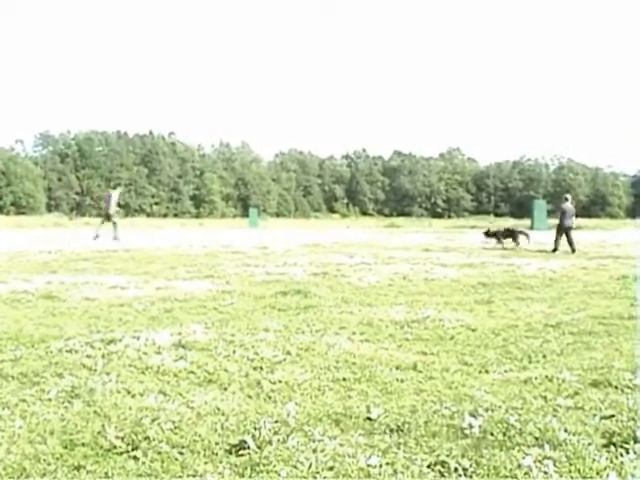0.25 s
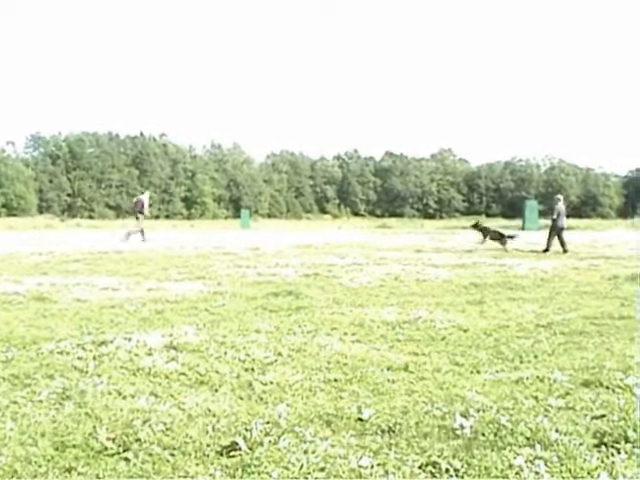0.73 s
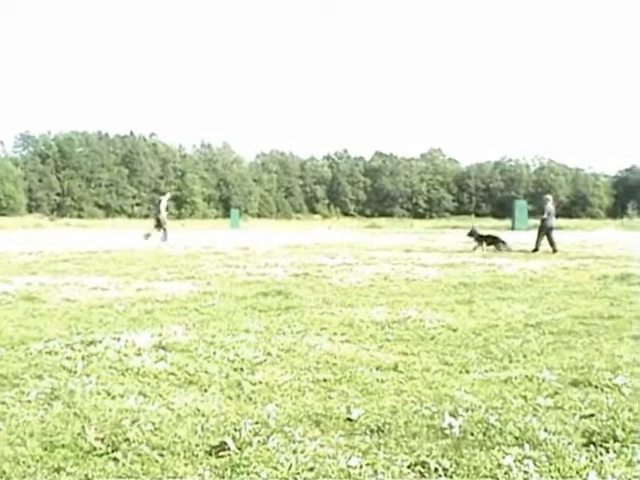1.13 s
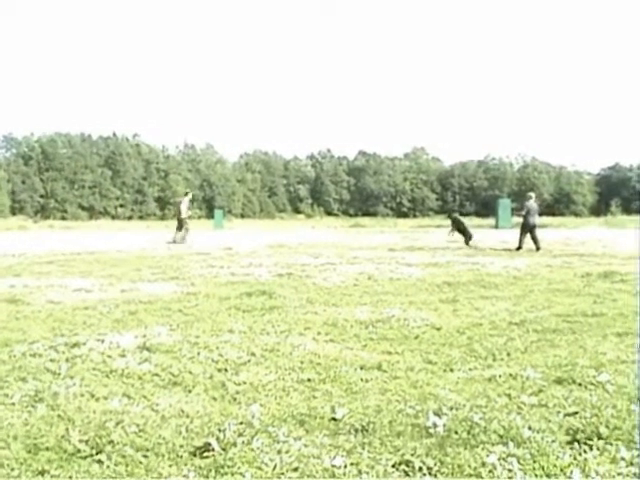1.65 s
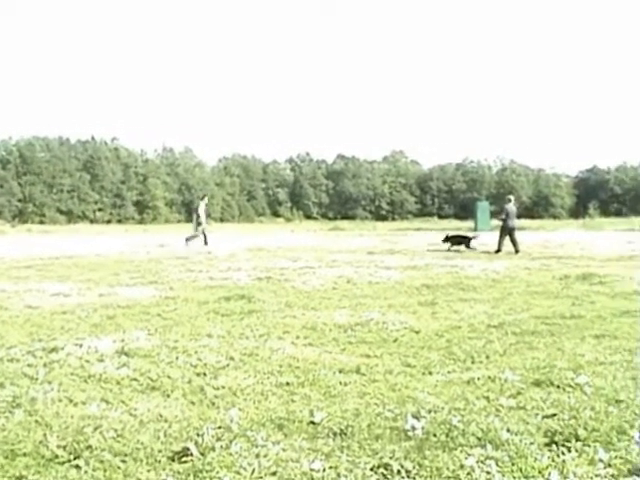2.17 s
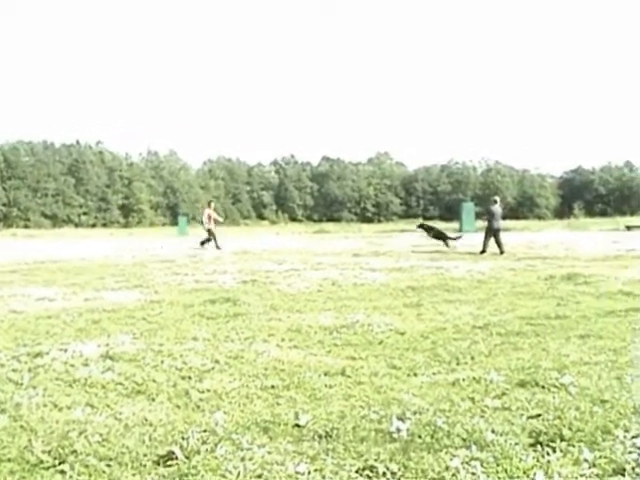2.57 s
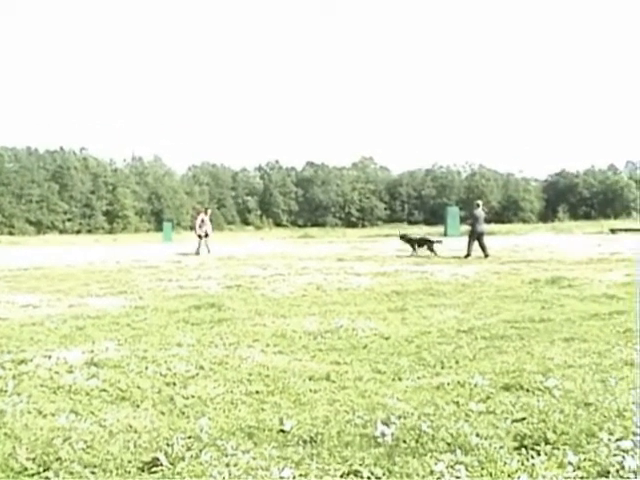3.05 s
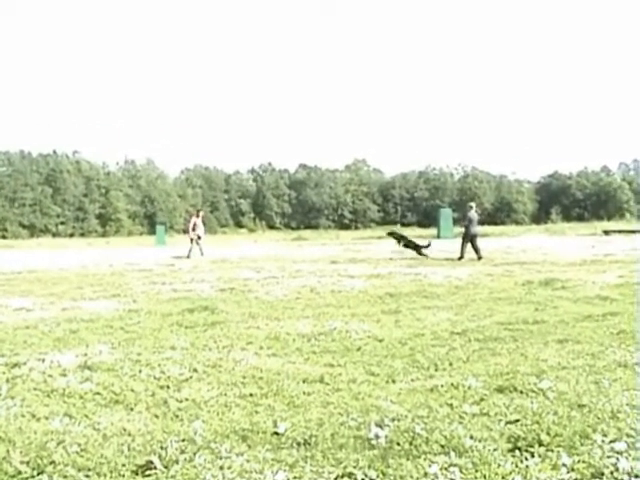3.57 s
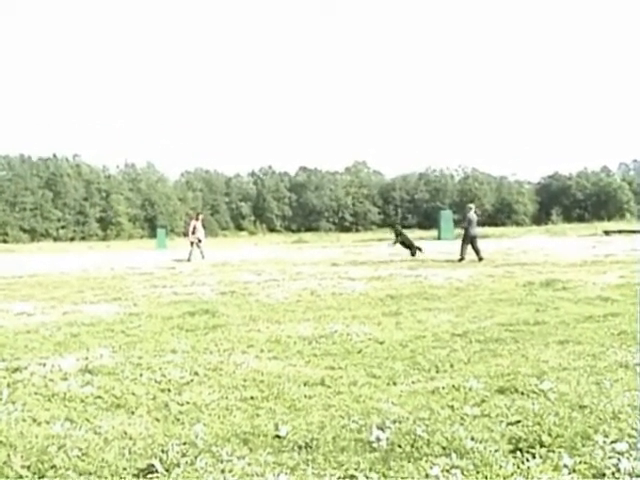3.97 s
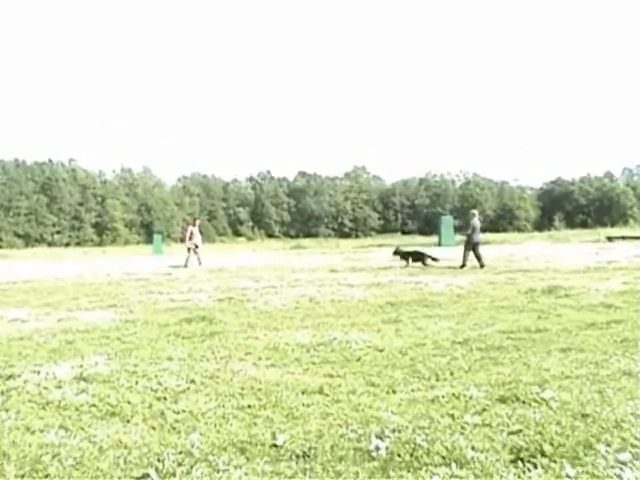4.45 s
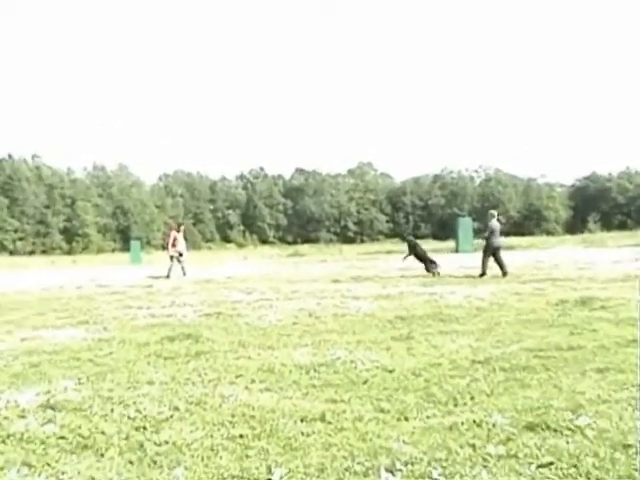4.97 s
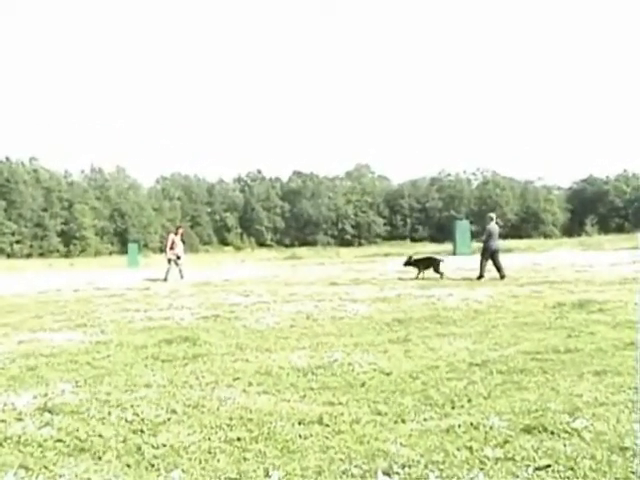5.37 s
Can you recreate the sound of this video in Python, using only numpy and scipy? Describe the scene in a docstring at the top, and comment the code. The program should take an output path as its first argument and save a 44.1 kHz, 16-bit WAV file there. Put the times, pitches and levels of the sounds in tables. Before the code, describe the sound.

A large dog barks loudly and steadily in an open grass field, about two short, rough barks a second, each with a light echo from the tree line. Just before two seconds in, a lower, hoarser dog starts answering from farther away. An insect rasps briefly, then birds chirp faintly. Distant traffic, a far idling engine and soft leaf rustle lie underneath. The first dog is much closer to the microphone than everything else.

```python
"""From the start a large dog barks steadily on an open grass field, its vocal folds buzzing through its
throat and mouth. A tree line returns one clear echo and a faint wash. All along, far traffic hums, leaves
rustle, an engine idles far away and the camera adds a thin whistle. Just before 2 s a second dog starts
to answer from farther off. Then an insect rasps, birds chirp from about 3 s on, and at about 3.5 s the
grass crackles once."""
import sys
import numpy as np
from scipy import signal
from scipy.fft import rfft, irfft, next_fast_len
from scipy.io import wavfile
from scipy.ndimage import uniform_filter1d, map_coordinates

SR = 44100
rng = np.random.default_rng(int(sys.argv[2]) if len(sys.argv) > 2 else 0)


def inscribe(sig):
    """Save sig as 16-bit PCM at rate SR to the path in sys.argv[1].

    A 1-D sig is mono; a 2-D sig holds one channel per row.
    Samples are clipped to [-1, 1] before scaling.
    """
    pcm = np.round(np.clip(np.atleast_2d(sig).T, -1, 1) * 32767)
    wavfile.write(sys.argv[1], SR, pcm.astype(np.int16))


N = 247394
T = np.arange(N) / SR
LEAD_S = .08  # the dogs are computed from this long before time 0, so the first bark has its echoes

# How well a dog's throat lets each frequency out: (frequency [Hz], gain [dB])
THROAT = [(150, -15.5), (270, -16.5), (350, 0), (450, 2), (2700, -8), (3200, -5), (3500, -14.5),
          (4500, -47)]


def amp(db):
    """Turn decibels into a factor to multiply by."""
    return 10 ** (np.asarray(db) / 20)


def unit(x):
    """Scale x to an average strength (rms) of 1."""
    return x / np.sqrt(np.mean(np.abs(x) ** 2) + 1e-20)


def along(points, hz):
    """Read between (frequency, value) points, spaced by octaves."""
    f, v = np.transpose(points)
    return np.interp(np.log(hz + 1), np.log(f + 1), v)


def curves(rows):
    """Turn each column after the time into one value per sample."""
    times, *columns = np.transpose(rows)
    return [np.interp(T, times, column) for column in columns]


def calls(tables):
    """A gate that is open only during the barks, and the barks' curves."""
    gate = sum((T >= rows[0][0]) & (T <= rows[-1][0]) for rows in tables)
    return uniform_filter1d(gate * 1., size=160), curves(np.vstack(tables))


def wobble(rate):
    """A smooth curve through `rate` random values a second."""
    return map_coordinates(rng.standard_normal(int(N * rate / SR) + 4), [T * rate])


def filtered(x, response):
    """Multiply each frequency in x by response(frequency)."""
    m = next_fast_len(N + SR // 2)
    return irfft(rfft(x, m) * response(np.fft.rfftfreq(m, 1 / SR)), m)[..., :N]


def blend(noise, one, other, share):
    """Noise that moves from one tone colour (share 0) to the other (share 1)."""
    def coloured(table):
        low, high = table[0][0], table[-1][0]
        return unit(filtered(noise, lambda hz: amp(along(table, hz)) * (hz > low) * (hz < high)))
    return (1 - share) * coloured(one) + share * coloured(other)


def patches(shape, bands, frames, depth_db):
    """Random gains that make patches of frequency and time louder or softer."""
    smooth = uniform_filter1d(rng.standard_normal(shape), size=bands, axis=0)
    return amp(depth_db * unit(uniform_filter1d(smooth, size=frames, axis=1)))


def patchy(x):
    """Give x resonances that come, move and go."""
    z = signal.stft(x, nperseg=256)[2]
    z = z * patches(z.shape, bands=5, frames=5, depth_db=4)
    return unit(signal.istft(z, nperseg=256)[1][:N])


def vocal_folds(pitch_hz, chaos, beat_hz, jitter, swing, sway):
    """The folds flap at the pitch; in chaos a second, unsteady vibration tugs at their timing and size."""
    beat = 2 * np.pi * np.cumsum(beat_hz * (1 + .55 * wobble(100))) / SR
    unsteady_hz = pitch_hz * (1 + 0.01234 * wobble(60) + jitter * chaos * wobble(200))
    phase = 2 * np.pi * np.cumsum(unsteady_hz) / SR
    pull = swing * chaos * np.sin(beat)
    size = 1 + sway * chaos * (np.cos(beat) + .5 * wobble(150))  # loudest as the pitch swings up
    return phase, pull, size / np.sqrt(1 + (sway * chaos) ** 2 * .75)


def overtones(phase, pitch_hz, halves, mouth, count):
    """Tones above the base tone; strong and weak cycles in turn add tones halfway between (halves)."""
    multiple = np.arange(3, count)[:, None] / 2
    gain = amp(mouth(multiple * pitch_hz)) * np.where(multiple % 1, halves, 1)
    tones = np.sum(gain * np.sin(multiple * phase + multiple ** 2), axis=0)
    return tones / np.sqrt(np.sum(gain ** 2, axis=0) / 2)


def near_bark(s, rise, close, length, top_db, settled_db, close_db,
              first_hz, top_hz, settled_hz, close_hz, last_hz, mouth_db, close_mouth_db,
              hiss_db, close_hiss_db, lips, settle, rising, breaking, settled, closing):
    """Curves of one bark: it swells, breaks roughly, settles, then the jaws close and the pitch drops."""
    # The swell, against the top: (share of the rise [0-1], level [dB], overtones [dB])
    swell_steps = [(0, -20, -9.5), (.3, -7, -2)]
    # The fade as the jaws close: (share of the closing time [0-1], level [dB], overtones [dB])
    fade_steps = [(0.548, -2.5, -11), (1, -14, -5.5)]
    s = s + LEAD_S
    break_s, settle_s = .01, .007  # time to turn rough, and to calm down
    resting_lips = 0.56
    swell = [(s + u * rise, top_db + down_db, first_hz + u * (top_hz - first_hz), mouth_db + shut_db)
             for u, down_db, shut_db in swell_steps]
    fade = [(s + close + u * (length - close), close_db + down_db,
             close_hz + u * (last_hz - close_hz), close_mouth_db + shut_db)
            for u, down_db, shut_db in fade_steps]
    voice = [*swell,
             (s + rise, top_db, top_hz, mouth_db),
             (s + (rise + settle) / 2, (top_db + settled_db) / 2, top_hz, mouth_db),
             (s + settle, settled_db, settled_hz, close_mouth_db),
             (s + close, close_db, close_hz, close_mouth_db),
             *fade]
    # (time [s], chaos [0-1], halfway tones [0-1])
    roughness = [(s, rising, .65), (s + rise, rising, .65),
                 (s + rise + break_s, breaking, .25), (s + settle - settle_s, breaking, .25),
                 (s + settle, settled, .3 * settled),
                 (s + close, closing, .3 * closing), (s + close + break_s, .45, 0)]
    hiss = [(s, hiss_db - 15, resting_lips),
            (s + rise, hiss_db, (resting_lips + lips) / 2),
            (s + close, close_hiss_db, lips),
            (s + length + .03, close_hiss_db - 18, resting_lips)]  # the breath outlasts the voice
    return voice, roughness, hiss


def near_dog():
    """A strong base tone rings in the throat, the mouth shapes overtones, and breath puffs once a cycle."""
    # One bark a row: (start [s], rise [s], jaws start closing after [s], length [s],
    # level at top, settled, closing [dB], pitch at start, top, settled, closing, end [Hz],
    # overtones against the base tone at top, closing [dB], hiss at top, closing [dB],
    # lips drawn back [0-1], settles after [s], chaos in rise, break, settled, closing [0-1])
    barks = [ (-.075, 0.02866, 0.12, 0.14, -13.5, -15.5, -16, 480, 558.2, 506.2, 474, 420, 0.5, 0, -35, -38.5, .5, .1, .3, .7, .6, .5),
             (0.439, 0.02915, 0.11, 0.14, -12, -10.5, -13, 484.6, 571.3, 509, 511.2, 362.6, -4, -7.5, -39.5, -39, 0.48, .06, .45, .9, .04, .04),
             (1.03, .032, .12, 0.16, -13, -14, -13, 504.1, 539, 495.3, 509.5, 334.2, -1.5, -5, -37, -41.5, 0.75, .062, .4, .9, .15, .6),
             (1.624, 0.0285, 0.11, 0.14, -15, -14, -15.5, 410, 527, 482, 462.6, 416.8, 4, -2, -43, -42.5, .2, .062, .5, .3, .07, .07),
             (2.164, 0.02205, 0.1, 0.14, -11, -12, -10.5, 429, 520.6, 508, 503.8, 410, -3, -8, -38, -38, 0.4, .059, .3, .9, .09, .09),
             (2.66, 0.027, 0.097, 0.12, -15, -16.5, -14.5, 515.7, 556, 480, 461.8, 440, -1.5, -3, -35.5, -38, .1, .093, .15, .7, .2, .2),
             (3.161, 0.037, 0.11, 0.15, -14.5, -10, -12.5, 533.5, 521.2, 495.4, 490.2, 315.2, -1, -6, -40, -43.5, 0.38, .061, .7, .7, .03, .03),
             (3.676, 0.0262, .074, .1, -14.5, -14.5, -13, 461.5, 524, 517, 502.4, 423.8, -2.5, -6, -39, -35, .1, .059, .6, .7, .3, .3),
             (4.242, 0.02547, 0.11, 0.15, -13.5, -13.5, -14.5, 446.8, 521.1, 497, 468, 375, -0.5, -3.5, -48.5, -40.5, 0.3, .058, .7, .8, .35, .5),
             (4.802, 0.0243, 0.12, 0.15, -13.5, -15, -14.5, 414.7, 530.5, 519.7, 478, 370, -2.5, -3.5, -40.5, -44.5, 0.031, .115, .5, .9, .5, .3),
             (5.328, .04, 0.1, .15, -10.5, -16, -15, 480, 522, 491.4, 467.4, 330, -2.5, -4.5, -38, -40.5, 0.027, .07, .6, .85, .3, .45),
             ]
    # Resonances of the throat and mouth: (frequency [Hz], gain [dB])
    usual_mouth = [(700, -9.5), (1000, -2), (1500, 6.5), (2000, -9.5), (2550, 1), (3050, -12.5),
                   (3600, -23.5)]
    # The same with the jaws wide open: (frequency [Hz], gain [dB])
    wide_mouth = [(700, -41.5), (1050, 2), (1350, -6), (1650, 5), (2100, 5.5), (2500, -4), (2900, -38),
                  (3600, -24)]
    # Breath through nearly closed lips: (frequency [Hz], gain [dB])
    narrow_lips = [(2800, -57), (3600, -13.5), (4600, 3), (5400, -0.5), (6500, -13.5), (8000, -19),
                   (10000, -33), (12000, -38), (15000, -57)]
    # Breath with the lips drawn back: (frequency [Hz], gain [dB])
    bared_lips = [(2800, -36.5), (3600, -11), (4600, -17.5), (5500, -5), (6400, 4), (7300, -2), (8200, -2),
                  (10000, -12), (12000, -19.5), (15000, -78)]
    voices, roughness, hisses = zip(*(near_bark(*row) for row in barks))
    gate, (db, pitch_hz, mouth_db) = calls(voices)
    chaos, halves = curves(np.vstack(roughness))
    phase, pull, size = vocal_folds(pitch_hz, chaos, beat_hz=175, jitter=.055, swing=1.6, sway=.42)
    gape = np.clip(2.37 * halves, 0, 1)  # the jaws are widest as the bark starts
    puffs = (1 + .5 * np.cos(phase)) * size * rng.standard_normal(N)
    air_share = np.clip(.07 + .55 * chaos, 0, 1)  # chaotic folds leak more rushing air
    colour = lambda hz: (1 - gape) * along(usual_mouth, hz) + gape * along(wide_mouth, hz)
    snap = phase + .35 * pull  # the folds' closing snap feels the tug less
    tones = overtones(snap, pitch_hz, halves, colour, count=14)
    air = blend(puffs, usual_mouth, wide_mouth, gape)
    mouth = np.sqrt(1 - air_share) * tones + np.sqrt(air_share) * air
    base_tone = size * np.sqrt(2) * np.sin(phase + pull)
    voice = gate * amp(db) * (base_tone + amp(mouth_db) * mouth)

    blowing, (hiss_db, lips) = calls(hisses)
    flutter = amp(1.2 * wobble(60))
    drawn_back = np.clip(lips + 0.13 * wobble(30), 0, 1)
    breath = flutter * blend(puffs, narrow_lips, bared_lips, drawn_back)
    hiss = blowing * amp(hiss_db) * patchy(breath)
    return filtered(voice, lambda hz: amp(along(THROAT, hz))) + hiss


def close_reflection(x):
    """x plus a bounce off a surface beside the camera, which adds on the left and subtracts on the right."""
    delay_s = .0025
    sides = np.array([[1], [-1]])
    bounce = lambda hz: sides * amp(-20.5 + 6 * hz / 9000) * np.exp(-2j * np.pi * hz * delay_s)
    lean_right = lambda hz: amp(-sides * 0.99 * np.exp(-np.log((hz + 1) / 1400) ** 2 / 0.3))
    skip_lead = lambda hz: np.exp(2j * np.pi * hz * LEAD_S)
    return filtered(x, lambda hz: (1 + bounce(hz)) * lean_right(hz) * skip_lead(hz))


def echoes(x):
    """Distant surfaces each send back one dull copy, from their own side."""
    # One echo a row: (delay [s], gain [dB], left side later than right by [s])
    bounces = [(.033, -17.5, 2e-4), (.098, -25.5, -1e-4), (.204, -20.5, 2e-4), (.36, -35.5, -2e-4)]
    sides = np.array([[.5], [-.5]])
    returns = lambda hz: sum(amp(db) * np.exp(-2j * np.pi * hz * (s - LEAD_S + sides * lag))
                             for s, db, lag in bounces)
    return filtered(x, lambda hz: returns(hz) / (1 + 1j * hz / 1800))


def trees(x):
    """The trees scatter sound into a wash; each frequency dies away at its own speed."""
    # How long the wash lasts: (frequency [Hz], time to fall by 60 dB [s])
    fade_times = [(300, 0.96), (1500, 1), (6000, 0.56), (14000, 0.86)]
    hz, t, z = signal.stft(rng.standard_normal((2, SR)), SR, nperseg=256)
    tail = signal.istft(z * amp(-60 * t / along(fade_times, hz)[:, None]), SR, nperseg=256)[1]
    tail = tail + 0.68 * tail[::-1]  # partly shared by left and right
    delayed = np.pad(x, (400, 0))[None]
    wash = signal.fftconvolve(delayed, tail / np.linalg.norm(tail[0]), axes=1)
    return wash[:, round(LEAD_S * SR):][:, :N]


def rush(spectrum):
    """Uneven stereo noise with the given tone colour, at strength 1."""
    # How alike left and right sound: (frequency [Hz], likeness [0-1])
    likeness = [(60, 0.97), (270, 0.99), (600, 0.78), (1500, 0.46), (4000, 0.5), (8000, 0.14), (14000, .6)]
    z = signal.stft(rng.standard_normal((2, N)), nperseg=512)[2]
    z = z * patches(z.shape[1:], bands=6, frames=14, depth_db=2.5)
    pair = signal.istft(z, nperseg=512)[1][:, :N]
    width = lambda hz: np.arccos(np.clip(along(likeness, hz), -1, 1)) / 2
    mid, side = filtered(pair, lambda hz: amp(along(spectrum, hz)) * [np.cos(width(hz)), np.sin(width(hz))])
    return unit(np.array([mid + side, mid - side]))


def traffic():
    """Far traffic blurs into a low hum."""
    # Tone colour of the hum: (frequency [Hz], gain [dB])
    spectrum = [(15, -53), (25, -12), (45, -11), (70, 2), (150, -8.5), (220, 5), (330, -1.5), (500, -13),
                (1200, -5), (1550, -5.5), (2100, -13.5), (3200, -24), (4500, -42)]
    # Its slow rise and fall: (time [s], level [dB])
    loudness = [(0.0, -38.5), (0.84, -38), (1.16, -39.5), (1.55, -41.5), (1.89, -39.5), (3.48, -41),
                (3.69, -36.5), (5.42, -40.5), (5.61, -38.5)]
    return amp(curves(loudness)[0]) * rush(spectrum)


def leaves():
    """Rustling leaves make a soft, high hiss."""
    # Tone colour of the rustle: (frequency [Hz], gain [dB])
    spectrum = [(1500, -24), (2500, -9), (3500, 1), (5000, 0.5), (6300, -2.5), (8000, -7), (10000, -10.5),
                (13000, -24), (15700, -26.5)]
    # Its swells: (time [s], level [dB])
    loudness = [(0.0, -50), (0.14, -55), (1.06, -55), (1.48, -56), (2.56, -56.5), (2.83, -56.5),
                (3.53, -54), (3.78, -49), (4.06, -57), (5.61, -54.5)]
    return amp(curves(loudness)[0]) * rush(spectrum)


def engine():
    """The firing of a far engine makes low tones that waver in speed and strength."""
    # The engine's tones: (frequency [Hz], level [dB])
    tones = [(72, -56), (143, -58.5), (215, -55.5)]
    wavering_time = np.cumsum(1 + .012 * wobble(5)) / SR
    return sum(amp(db + 0.76 * wobble(5.1)) * np.sqrt(2) * np.sin(2 * np.pi * hz * wavering_time)
               for hz, db in tones)


def far_bark(s, rise, hold, fall, db, hz, held_hz, base_db, held_base_db, chaos):
    """Curves of one bark: it swells, holds and fades as the pitch arches; the overtones fade first."""
    s = s + LEAD_S
    return [(s, db - 18, .9 * hz, base_db + 8, chaos),
            (s + rise, db, hz, base_db, chaos),
            (s + rise + hold, db, held_hz, held_base_db, chaos),
            (s + rise + hold + fall, db - 20, .78 * held_hz, held_base_db + 8, chaos)]


def far_dog():
    """A lower, hoarser voice; distance has taken its treble."""
    # One bark a row: (start [s], rise [s], hold [s], fall [s], overtone level [dB], pitch at start,
    # end of the hold [Hz], base tone against the overtones at start, end of the hold [dB], chaos [0-1])
    barks = [(1.775, .022, .048, .03, -29, 425, 405, 2, 8, .25),
             (1.97, .06, .03, .07, -24, 415, 430, 0, -4, .5),
             (2.285, .025, .02, .04, -23, 365, 380, 0, 0, .45),
             (3.77, .02, .012, .025, -33, 415, 400, 8, 8, .3),
             (3.85, .045, .045, .055, -28, 425, 428, 2, 5, .3),
             (4.04, .058, .052, .045, -21, 400, 425, -6, -2, .33),
             (4.35, .025, .04, .055, -24, 380, 435, -6, 2, .4),
             (4.625, .06, .04, .045, -24, 370, 430, -7, -4, .5),
             (5.235, .035, .04, .04, -22, 375, 435, -7, 4, .3)]
    # Resonances of its mouth, heard from afar: (frequency [Hz], gain [dB])
    mouth = [(600, 4.5), (850, 12.5), (1150, 14.5), (1600, -8), (2000, -35), (3000, -52)]
    gate, (db, pitch_hz, base_db, chaos) = calls([far_bark(*row) for row in barks])
    phase, pull, size = vocal_folds(pitch_hz, chaos, beat_hz=130, jitter=.11, swing=1.1, sway=.55)
    phase = phase + pull
    tones = overtones(phase, pitch_hz, halves=0.23, mouth=lambda hz: along(mouth, hz), count=12)
    base_tone = amp(base_db + 2.5 * wobble(50)) * np.sqrt(2) * np.sin(phase)  # it comes and goes
    voice = gate * amp(db) * size * (tones + base_tone)
    return filtered(voice, lambda hz: amp(along(THROAT, hz * 0.96)))


def insect():
    """An insect's fast scrapes ring in one broad, high resonance."""
    # The rasp swells and fades: (time [s], level [dB])
    loudness = [(2.28, -87), (2.36, -68), (2.65, -58), (2.85, -60), (3.1, -58), (3.2, -78)]
    scrapes = amp(3.2 * wobble(68)) * rng.standard_normal(N)
    rasp = filtered(scrapes, lambda hz: np.exp(-((hz - 5050) / 600) ** 4))
    return amp(curves(loudness)[0]) * unit(rasp)


def birds():
    """Pure, slightly unsteady notes that drop in pitch, level out and may hook upward."""
    # One note a row: (start [s], length [s], first pitch [Hz], pitch it sinks toward [Hz],
    # glide speed [per note], final rise [Hz], level [dB])
    notes = [(2.95, .025, 7900, 7000, 1.5, 0, -67), (3.33, .21, 6050, 5950, .8, 0, -65),
             (3.9, .09, 5200, 3330, 7, 300, -52), (4.235, .06, 4600, 3300, 4.5, 0, -52),
             (4.54, .04, 6600, 4500, 2, 0, -59), (4.52, .3, 6650, 6600, .8, 0, -71),
             (5.25, .07, 5800, 3900, 7, 450, -51)]
    out = np.zeros(N + SR)
    for s, length, start_hz, low_hz, speed, rise_hz, db in notes:
        progress = np.arange(round(length * SR)) / (length * SR)
        hz = low_hz + (start_hz - low_hz) * np.exp(-speed * progress) + rise_hz * progress ** 3
        swell = amp(db) * np.sqrt(np.sin(np.pi * progress))
        out[round(s * SR):][:len(hz)] += swell * np.sin(2 * np.pi * np.cumsum(hz) / SR)
    return out[:N] * amp(2.4 * wobble(38))


def grass_crackle():
    """The grass gives a few faint snaps, each a tiny burst of noise."""
    # One snap a row: (time [s], level before filtering [dB])
    snaps = [(3.5357, -41), (3.598, -34.5), (3.6235, -33)]
    out, t = np.zeros(N), np.arange(256) / SR
    for s, db in snaps:
        out[round(s * SR):][:len(t)] = amp(db - 60 * t / .005) * rng.standard_normal(len(t))
    return filtered(out, lambda hz: hz / (hz + 1500) / (1 + (hz / 6000) ** 2))


def scene():
    """Both dogs and their echoes over the quiet sounds of the field, in stereo."""
    dogs = near_dog() + far_dog()
    barking = close_reflection(dogs) + echoes(dogs) + amp(-19.5) * trees(dogs)
    chirps = birds() * amp([[1.5], [-1.5]])  # a little to the left
    return barking + chirps + insect() + grass_crackle() + engine() + traffic() + leaves()


def record(dry):
    """The camera's amplifier rounds off loud peaks, its line whistle leaks in, and the top treble is cut."""
    peak_limit, whistle_hz, top_hz = .85, 15625, 15750
    rounded = dry / (1 + np.abs(dry / peak_limit) ** 4) ** (1 / 4)
    whistle = amp([[-75.5], [-80.5]]) * np.sin(2 * np.pi * whistle_hz * T)
    return filtered(rounded + whistle, lambda hz: hz < top_hz)


dry = scene()
out = record(dry)
inscribe(out)
```